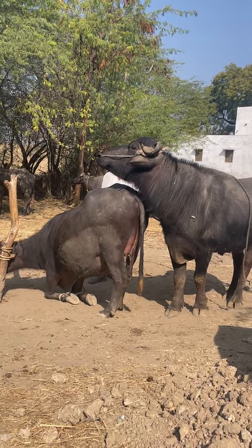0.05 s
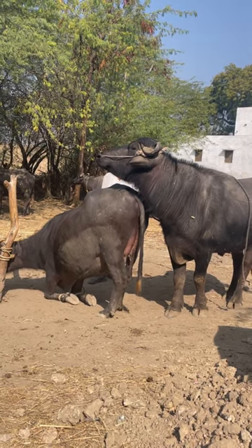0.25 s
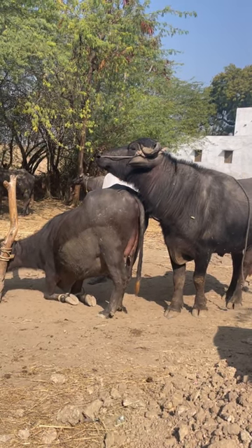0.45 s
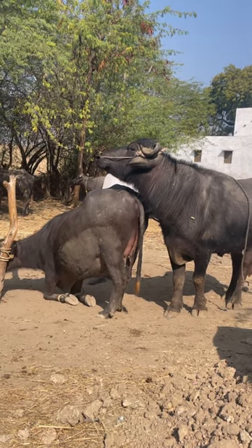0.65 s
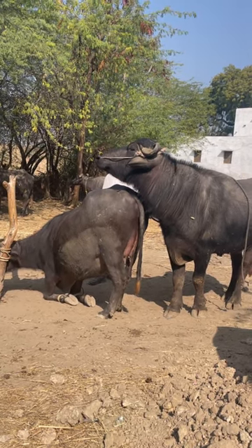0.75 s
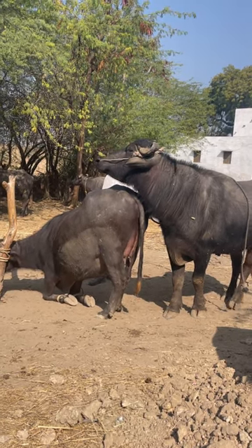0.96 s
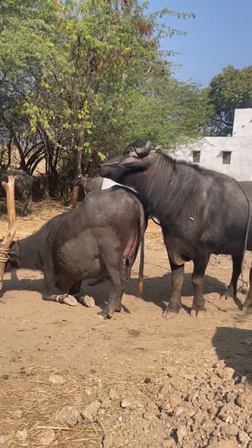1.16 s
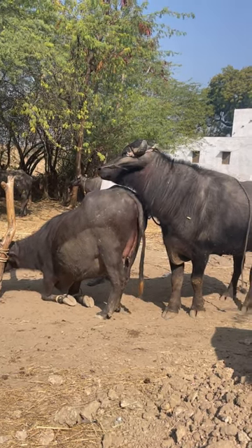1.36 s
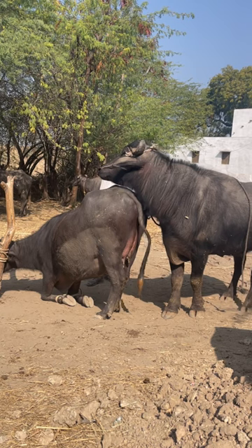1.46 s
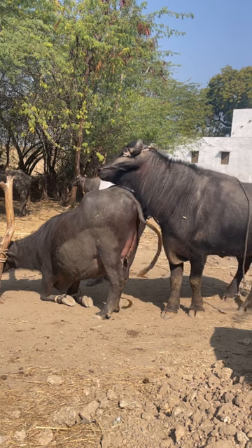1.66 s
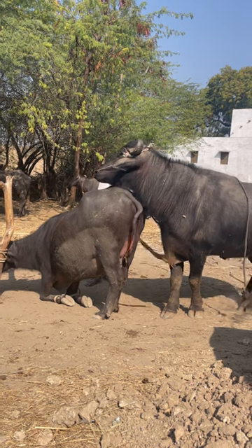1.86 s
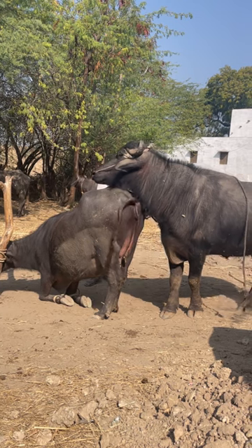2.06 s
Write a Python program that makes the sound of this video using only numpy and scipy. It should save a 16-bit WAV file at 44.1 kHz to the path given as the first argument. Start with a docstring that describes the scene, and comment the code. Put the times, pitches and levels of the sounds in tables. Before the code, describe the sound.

A water buffalo gives one long, low nasal grunt that slows into creaky pulses, then draws a raspy breath. Small birds chirp faintly in the trees around the quiet outdoor yard.

```python
"""A water buffalo gives one long grunt in a dry yard. Its vocal folds are the source, nose and mouth
the filter: a nasal hum, brightened while the mouth is open, sags into slow separate pulses.
Turbulent air hisses in its nostrils as it puffs and inhales. Small birds chirp in gliding tones
that scatter among the trees, over brief rustles of straw, a faint low rumble and a thin hiss."""
import sys
import numpy as np
from scipy import signal
from scipy.fft import rfft, irfft, next_fast_len
from scipy.io import wavfile
from scipy.ndimage import map_coordinates

SR = 44100
rng = np.random.default_rng(int(sys.argv[2]) if len(sys.argv) > 2 else 0)


def bounce(signal):
    """Save signal as a 16-bit WAV file at the path given by the first command-line argument."""
    frames = np.transpose(np.atleast_2d(signal))
    limited = np.clip(frames, -1, 1)
    pcm = np.round(limited * 32767).astype(np.int16)
    wavfile.write(sys.argv[1], SR, pcm)


N = 92610


def amp(db):
    """Amplitude ratio of a level in decibels."""
    return 10 ** (np.asarray(db) / 20)


def unit(x):
    """Normalisation to rms 1."""
    return x / np.sqrt(np.mean(x ** 2) + 1e-20)


def along(points, hz):
    """Interpolation of (frequency [Hz], value) points on a logarithmic frequency axis."""
    freqs, values = np.transpose(points)
    return np.interp(np.log(hz + 1), np.log(freqs + 1), values)


def tint(points):
    """Magnitude response through (frequency [Hz], gain [dB]) points."""
    return lambda hz: amp(along(points, hz))


def envelope(points):
    """Amplitude envelope through (time [s], level [dB]) points, silent outside them."""
    times, db = np.transpose(points)
    return amp(np.interp(np.arange(N) / SR, times, db, left=-140, right=-140))


def fade(start_s, end_s):
    """Linear ramp from 0 to 1."""
    return np.clip((np.arange(N) / SR - start_s) / (end_s - start_s), 0, 1)


def wobble(per_s):
    """Random modulation: a spline through per_s Gaussian values a second."""
    return map_coordinates(rng.standard_normal(int(N * per_s / SR) + 4), [np.arange(N) * per_s / SR])


def filtered(x, response):
    """Linear filtering: the spectrum is multiplied by a complex frequency response."""
    size = 2 * next_fast_len(N)
    return irfft(rfft(x, size) * response(np.fft.rfftfreq(size, 1 / SR)), size)[..., :N]


def minimum_phase(gain):
    """Causal response of a given magnitude, by folding the cepstrum onto positive time."""
    cepstrum = irfft(np.log(np.maximum(gain, 1e-6)))
    half = len(cepstrum) // 2
    cepstrum[1:half] *= 2
    cepstrum[half + 1:] = 0
    return np.exp(rfft(cepstrum))


def steady(x):
    """Division by the running rms evens out the slow level of a pulse train."""
    window = np.hanning(2600)
    power = np.abs(signal.fftconvolve(x * x, window / window.sum(), "same"))
    return x / np.sqrt(power + .02 * power.mean())


def resonate(source, gain, lag_s=0):
    """Forced resonance: a passage rings with each pulse, after a delay and at an even level."""
    ringing = filtered(source, lambda hz: minimum_phase(gain(hz)) * np.exp(-2j * np.pi * hz * lag_s))
    return steady(ringing)


def noise(colour, coherence):
    """Coloured noise of rms 1; the mix of mid and side sets the coherence between the ears."""
    mid, side = filtered(rng.standard_normal((2, N)), tint(colour))
    angle = np.arccos(coherence) / 2
    return unit(np.cos(angle) * mid + np.sin(angle) * np.array([side, -side]))


def background():
    """Ambient noise: a distant rumble, coherent at the ears, and a thin, mostly incoherent hiss."""
    # spectra of rumble and hiss (frequency [Hz], relative level [dB])
    rumble_colour = [(20, -37), (38, -16.5), (56, 6), (68, -9.5), (85, -4), (130, -27), (220, -32),
                     (500, -38.5), (1500, -90.5)]
    hiss_colour = [(150, -4.5), (400, 1), (900, 4), (1600, 1), (3000, -6.5), (4500, -4.5), (6000, -12.5),
                   (7500, -36.5), (9500, -16), (14000, -31.5)]
    # envelope of the hiss (time [s], level [dB])
    hiss_level = [(0, -69.5), (.18, -76), (1.92, -75), (1.98, -67.5), (2.11, -68.5)]
    rumble = amp(-53) * noise(rumble_colour, coherence=1)
    return rumble + noise(hiss_colour, coherence=.17) * envelope(hiss_level)


def scatter(x, decay):
    """Reverberation: scatter from trees and walls decays exponentially, differently at each ear."""
    hz, t, spectra = signal.stft(rng.standard_normal((2, SR // 2)), SR, nperseg=256)
    t60_s = along(decay, hz)[:, None]
    tail = signal.istft(spectra * amp(-60 * t / t60_s), SR, nperseg=256)[1]
    wet = signal.fftconvolve(x, tail / np.linalg.norm(tail[0]), axes=1)[:, :N]
    return filtered(wet, lambda hz: hz ** 4 / (hz ** 4 + 400 ** 4))  # high-pass at 400 Hz


def straw():
    """Dry straw rustles: high-frequency noise under brief Gaussian envelopes."""
    # rustles (centre time [s], duration [s], peak level [dB])
    rustles = [(0.914, 0.05, -61.5), (1.812, 0.22, -64)]
    # their spectrum (frequency [Hz], relative level [dB])
    rustle_colour = [(2000, -52), (3500, 0.5), (4500, 7.5), (6200, -6.5), (7800, -30.5), (10000, -10.5),
                     (14000, -39)]
    t = np.arange(N) / SR
    swells = sum(amp(db) * np.exp(-(2 * (t - at) / length) ** 2) for at, length, db in rustles)
    return noise(rustle_colour, coherence=.24) * swells


def bird_note(onset_s, length_s, start_hz, middle_hz, end_hz, db, side_db, octave_db=None):
    """Frequency modulation: a whistle glides through three pitches; harmonics make it reedy."""
    quaver_per_octave, harmonic_fall_db, lag_s_per_db = .026, 16.5, .00013
    progress = np.linspace(0, 1, int(length_s * SR))
    glide_hz = np.polyval(np.polyfit([0, .5, 1], [start_hz, middle_hz, end_hz], 2), progress)
    octaves = np.log2(glide_hz.max() / glide_hz.min())
    quaver = quaver_per_octave * octaves * wobble(per_s=300)[:len(progress)]
    phase = 2 * np.pi * np.cumsum(glide_hz * (1 + quaver)) / SR
    tone = np.sin(phase)
    if octave_db is not None:
        tone += sum(amp(octave_db - harmonic_fall_db * (k - 2)) * np.sin(k * phase) for k in (2, 3, 4))
    tone *= np.abs(np.sin(np.pi * progress)) ** .7
    out = np.zeros((2, N + SR))
    for ear, ear_db in enumerate([side_db / 2, -side_db / 2]):
        start = max(0, int((onset_s - lag_s_per_db * ear_db) * SR))  # later at the far ear
        out[ear, start:start + len(tone)] += amp(db + ear_db) * tone
    return out[:, :N]


def birds():
    """Whistles and reedy calls from the trees, located by interaural level and delay."""
    # whistles (onset [s], duration [s], start pitch [Hz], middle pitch [Hz], end pitch [Hz],
    # level [dB], left minus right [dB])
    whistles = [(0.04, 0.092, 5900, 5260, 5290, -73.5, -2.5), (0.15, 0.078, 6450, 5060, 4050, -67, 9),
                (0.241, 0.03, 3720, 3730, 2670, -48, -1.5), (0.276, 0.014, 3100, 3195, 4200, -44.5, 2.5),
                (0.301, 0.01, 2900, 3630, 4900, -39, -1), (.324, 0.013, 3800, 3970, 4600, -43, -2),
                (.39, .11, 4100, 4150, 4050, -58, 0), (.495, .04, 5850, 5450, 4500, -63, 0),
                (1.049, .135, 3617, 3823, 3527, -55, 4), (1.572, 0.12, 6850, 5750, 4770, -61.5, 1),
                (1.668, 0.039, 5200, 4810, 3740, -54.5, -10), (1.681, 0.13, 3430, 3857, 3420, -53.5, 4),
                (1.752, 0.05, 6700, 5700, 4750, -56.5, 0), (1.795, .014, 4900, 4400, 3640, -53, -5.5),
                (1.845, 0.023, 7000, 6070, 5100, -61.5, 1.5), (1.908, 0.024, 4300, 5600, 4400, -62, 0),
                (1.918, 0.078, 3800, 5400, 3700, -60, -1.5), (2.023, 0.041, 5400, 4620, 2900, -59.5, 5)]
    # calls of a lower-voiced bird (the same columns, second harmonic re fundamental [dB])
    reedy_calls = [(0, 0.06, 1900, 1750, 1540, -68, 2, 6), (0.319, .05, 2190, 2357, 2287, -53.5, -10, -4.5),
                   (0.364, .042, 2367, 2028, 1516, -60.5, -6.5, 15),
                   (1.727, .1, 2530, 2150, 1950, -57.5, -3.5, 3),
                   (1.995, 0.14, 2427, 2380, 2260, -62.5, -4, -17)]
    return sum(bird_note(*row) for row in whistles + reedy_calls)


def nostrils():
    """Turbulence noise: the buffalo puffs, then draws air with a rasp and a low flutter."""
    # envelopes of the breath (time [s], level [dB])
    puff_level = [(.2, -72), (.27, -53), (.45, -58), (.95, -62), (1.04, -64), (1.1, -50), (1.13, -60.5),
                  (1.2, -68.5), (1.28, -99)]
    intake_level = [(1.302, -86), (1.314, -65), (1.43, -57), (1.55, -58.5), (1.7, -62.5), (1.82, -66.5),
                    (1.9, -75.5)]
    flutter_level = [(1.29, -63), (1.35, -52), (1.42, -45), (1.49, -57.5), (1.62, -68.5), (1.72, -90)]
    # spectra of the breath (frequency [Hz], relative level [dB])
    puff_colour = [(200, -33), (600, 2), (850, -4.5), (1300, -1.5), (1700, -2.5), (2350, -2), (3000, -10),
                   (3900, -9), (5500, -16.5), (7500, -38.5), (9500, -27), (12500, -40), (14000, -60)]
    intake_colour = [(400, -11), (900, -14), (1250, -11), (1480, 1), (1680, -3.5), (1880, 3), (2200, -7),
                     (3000, -16), (4000, -16), (5500, -11), (6500, -22.5), (7600, -49), (10000, -24),
                     (12500, -35.5), (14000, -43)]
    flutter_colour = [(70, -23.5), (140, -7), (182, 2), (215, -12.5), (270, -12.5), (340, -27),
                      (520, -38.5), (690, -22.5), (900, -38), (1400, -69)]
    puff = noise(puff_colour, coherence=.22) * envelope(puff_level)
    intake = noise(intake_colour, coherence=.41) * envelope(intake_level)
    rasp = unit(amp(2.5 * wobble(per_s=110)))
    flutter = noise(flutter_colour, coherence=.98) * envelope(flutter_level)
    return (puff + intake) * rasp + flutter


def throat():
    """Glottal source: a pulse at each closure of the vocal folds, and air noise that swells with it."""
    # vibration of the folds (time [s], pulse rate [Hz])
    pitch = [(0.19, 48), (0.27, 83.4), (0.386, 81.34), (0.481, 81.7), (0.601, 84.79), (0.691, 85.78),
             (0.735, 85.73), (0.788, 84.41), (0.92, 80.8), (0.992, 76.6), (1.042, 59.3), (1.089, 53.87),
             (1.16, 49.8), (1.302, 30.03)]
    jitter_s, shimmer_db = .000016, .55
    times, hz = np.transpose(pitch)
    t = np.arange(N) / SR
    cycles = np.cumsum(np.interp(t, times, hz, left=0, right=0)) / SR
    closures_s = np.interp(np.arange(int(cycles[-1]) + 1), cycles, t)
    chance = rng.standard_normal((len(closures_s), 2))
    centres = (closures_s + jitter_s * chance[:, 0])[:, None] * SR
    strengths = amp(shimmer_db * chance[:, 1:])
    taps = centres.astype(int) + np.arange(-7, 9)
    # a windowed sinc places each pulse between samples
    shape = np.sinc(taps - centres) * np.cos(np.pi * (taps - centres) / 16) ** 2
    pulses = np.bincount(taps.ravel(), (shape * strengths).ravel(), N)[:N]
    voiced = (t > times[0]) & (t < times[-1])
    air = rng.standard_normal(N) * np.exp(-(cycles % 1) / .6) * voiced
    return unit(pulses), unit(air)


def vowel(formants):
    """Formant response: the mouth's resonances add in power within a steep-sided pass band."""
    low_hz, high_hz = 550, 1518

    def gain(hz):
        power = sum(amp(2 * db) / (1 + (1.91 * (hz - centre) / width) ** 2) ** 1.53
                    for centre, width, db in formants)
        band_loss = (1 + (low_hz / (hz + 1)) ** 8) * (1 + (hz / high_hz) ** 30)
        return np.sqrt(power / band_loss)
    return gain


def nasal_hum(pulses):
    """Nasal resonance passes the low harmonics, and turns duller as the mouth shuts."""
    # response of the nose, mouth open and mouth shut (frequency [Hz], relative gain [dB])
    open_colour = [(30, -67), (60, 4.5), (84, -7), (125, 11), (165, 5.5), (250, 0), (335, -16), (425, -18),
                   (510, -24.5), (700, -42.5), (1200, -67.5), (3000, -100)]
    shut_colour = [(25, -37.5), (50, -6), (100, 9.5), (150, 9), (195, 8), (250, -16), (330, -20),
                   (600, -40.5), (2000, -104)]
    # envelope of the hum (time [s], level [dB])
    hum_level = [(.18, -63), (.215, -48.5), (.27, -38), (.31, -33.5), (.45, -31.5), (.72, -30.5), (.9, -35),
                 (1.0, -39.5), (1.07, -36), (1.22, -39.5), (1.265, -43.5), (1.32, -62)]
    shut = fade(.98, 1.09)
    open_hum = resonate(pulses, tint(open_colour), lag_s=.00546)
    shut_hum = resonate(pulses, tint(shut_colour), lag_s=.0029)
    return steady((1 - shut) * open_hum + shut * shut_hum) * envelope(hum_level)


def mouth(source, lag_s):
    """Cavity resonance follows shape: three vowels cross-fade as the mouth opens, holds and narrows."""
    # formants of each shape (frequency [Hz], width [Hz], relative gain [dB])
    opening = [(707, 65, 0), (961, 150, -6), (1223, 85, -5.5), (1472, 180, -2)]
    held = [(639.3, 66, 6.5), (940, 30, -26), (1128.3, 24, 10.5), (1223.4, 60, 14.5), (1377, 130, 7),
            (1454, 54, 10.5)]
    narrowing = [(653, 25, 1.1), (1154, 32, 6.8), (1241, 38, 10.1), (1356, 44, 1), (1521, 91, 10.6)]
    # radiation from the open mouth (time [s], level [dB])
    mouth_level = [(.21, -84.5), (.255, -51), (.31, -41), (.41, -33.5), (.62, -33.5), (.75, -31.5),
                   (.87, -35), (.98, -40.5), (1.03, -48), (1.07, -56), (1.15, -79)]
    opened, narrowed = fade(.29, .4), fade(.71, .9)
    shapes = [(1 - opened, opening), (opened - narrowed, held), (narrowed, narrowing)]
    voice = sum(share * resonate(source, vowel(formants), lag_s) for share, formants in shapes)
    return steady(voice) * envelope(mouth_level)


def ears(hz):
    """Binaural transfer function: the voice reaches each ear with its own level and phase."""
    # interaural level (frequency [Hz], left minus right [dB])
    balance = [(330, -2.5), (480, -5), (650, 22.5), (900, 5.5), (1200, 11.5), (1450, 6), (1650, 3.5),
               (2400, -14.5), (3400, 7.5), (4100, -2), (6000, -0.5)]
    # interaural phase (frequency [Hz], lead of the left ear [rad])
    lead = [(0, -6.5), (430, 3.5), (690, -4), (1030, 1.56), (2410, -0.78), (2930, 1.5), (3450, 1.48),
            (5000, -3.5), (6370, 4)]
    sides = np.array([[-1], [1]])
    gains = 2 / (1 + amp(sides * along(balance, hz)))
    return gains * np.exp(-.5j * sides * along(lead, hz))


def grunt():
    """Source and filter: throat pulses drive hum, vowel, treble buzz and, as the mouth shuts, creak."""
    # resonances of the buzz and of the creak's dry clicks (frequency [Hz], relative gain [dB])
    buzz_colour = [(900, -41), (1600, -3.5), (1820, 13.5), (2000, -4), (2200, 3.5), (2550, -5.5),
                   (3000, -8), (3420, 16), (3650, -6), (3850, 13), (4200, -25), (4450, -5.5), (4850, -36),
                   (5400, -14), (5750, -1.5), (6500, -41), (7800, -26.5), (9000, -9.5), (10500, -40.5),
                   (12000, -26.5), (14000, -51.5)]
    creak_colour = [(300, -5), (620, 5), (900, -23.5), (1400, -15.5), (2000, 3), (2700, -27.5), (3700, -8),
                    (4600, -38.5), (5500, -31), (7000, -52.5)]
    # their envelopes (time [s], level [dB])
    buzz_level = [(.22, -65), (.29, -62.5), (.45, -54), (.6, -52), (.74, -51), (.86, -56.5), (1.0, -76.5),
                  (1.08, -102)]
    creak_level = [(.8, -64.5), (.93, -57), (1.03, -61), (1.12, -65), (1.238, -62.5), (1.265, -73),
                   (1.3, -101)]
    mouth_lag_s, waver_db = .001514, 1.2
    pulses, air = throat()
    voice = mouth(pulses + .07 * air, mouth_lag_s)
    waver = amp(waver_db * wobble(per_s=11))
    buzz = resonate(pulses + .24 * air, tint(buzz_colour), mouth_lag_s) * waver * envelope(buzz_level)
    creak = resonate(pulses + .5 * air, tint(creak_colour)) * envelope(creak_level)
    return nasal_hum(pulses) + filtered(voice + buzz + creak, ears)


def scene():
    """Superposition of buffalo, birds, their reverberation and the quiet sounds of the yard."""
    # reverberation of the yard and of the trees (frequency [Hz], time to fall 60 dB [s])
    yard_decay = [(150, .3), (1200, 0.16), (4000, 0.047), (10000, 0.047)]
    tree_decay = [(1500, 0.41), (4200, 0.29), (6000, 0.39), (10000, 0.11)]
    buffalo, song = grunt() + nostrils(), birds()
    echoes = amp(-28) * scatter(buffalo, yard_decay) + amp(-6) * scatter(song, tree_decay)
    return buffalo + song + echoes + straw() + background()


def record(dry):
    """Band limiting: a steep low-pass removes the highest treble."""
    cutoff_hz = 13200
    return filtered(dry, lambda hz: 1 / np.sqrt(1 + (hz / cutoff_hz) ** 80))


dry = scene()
out = record(dry)
bounce(out)
```